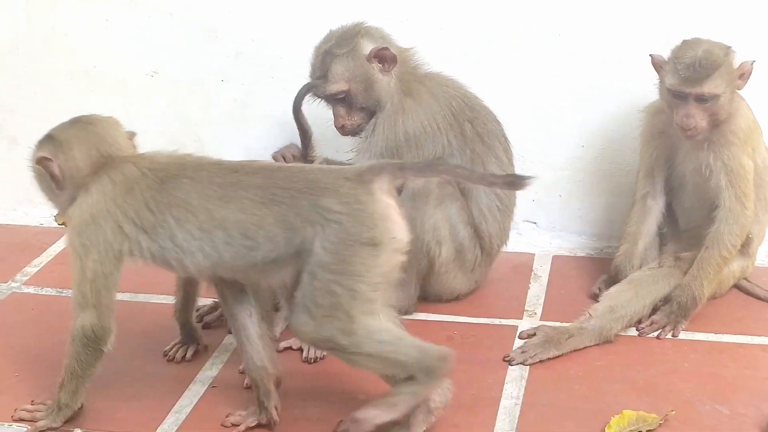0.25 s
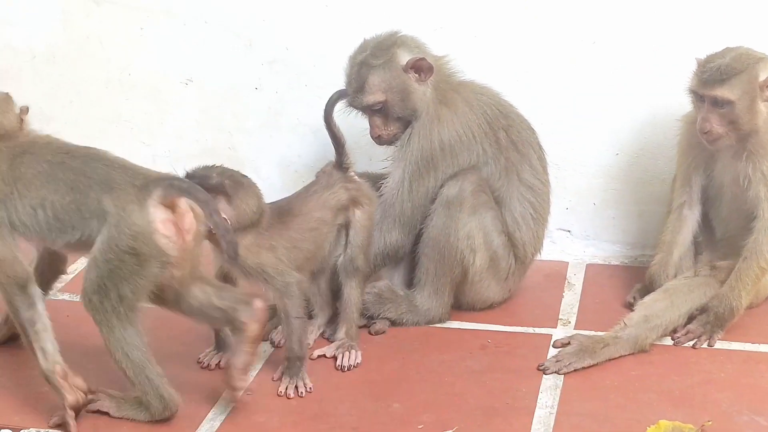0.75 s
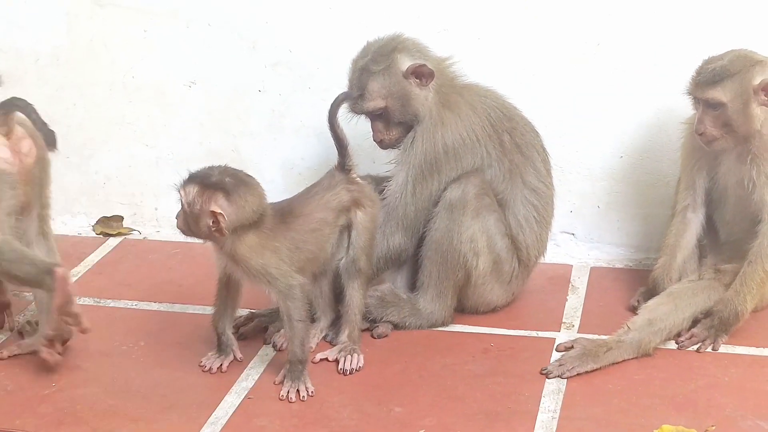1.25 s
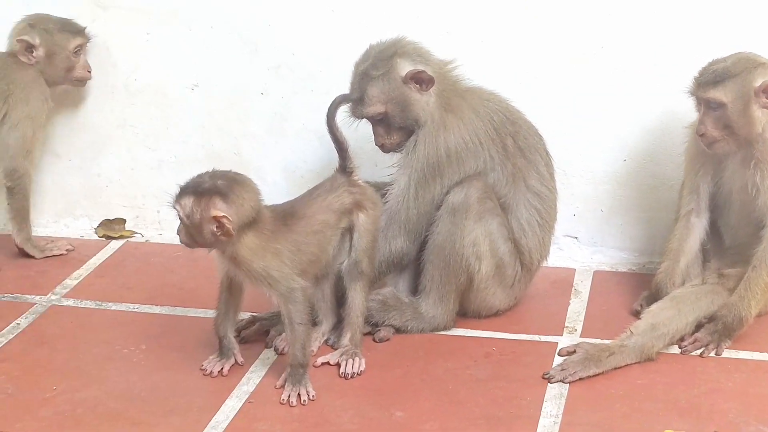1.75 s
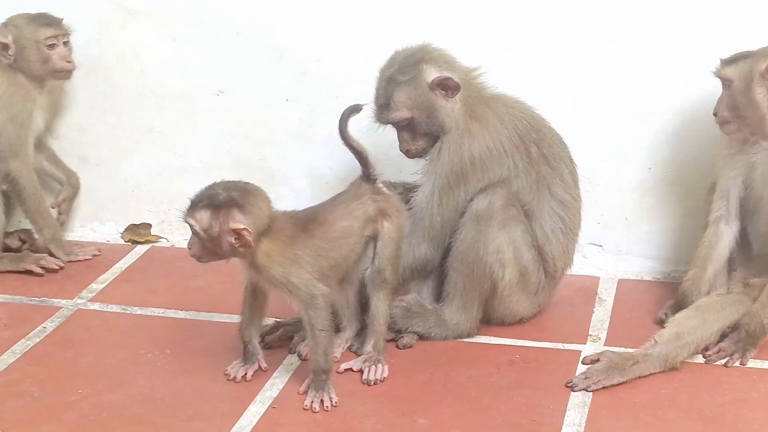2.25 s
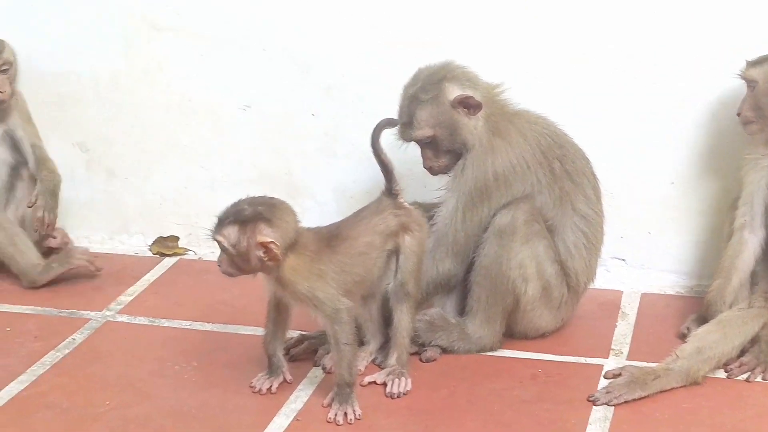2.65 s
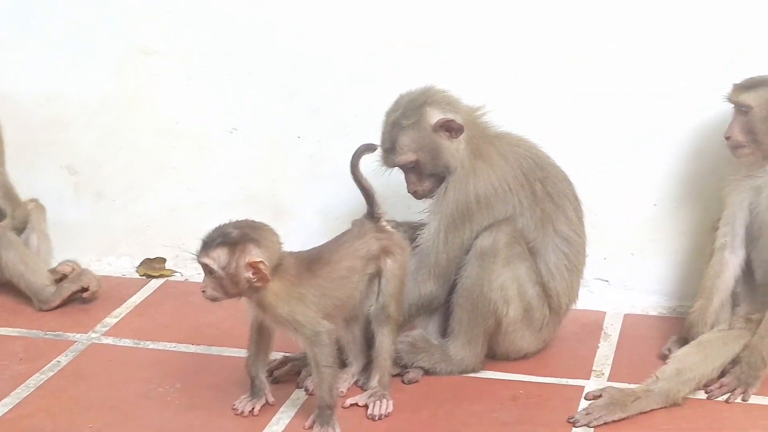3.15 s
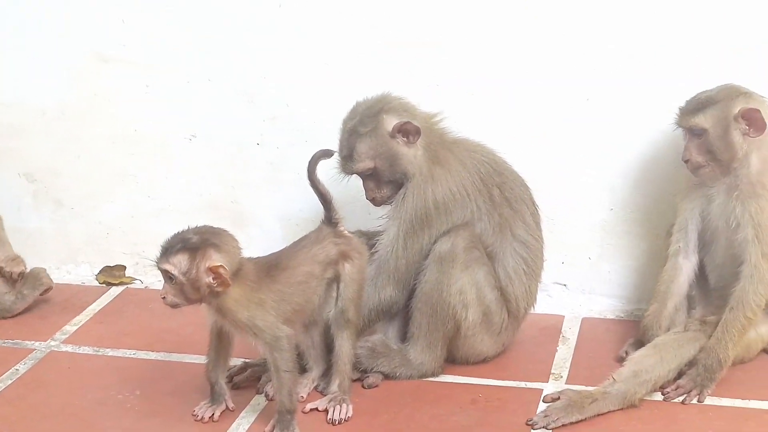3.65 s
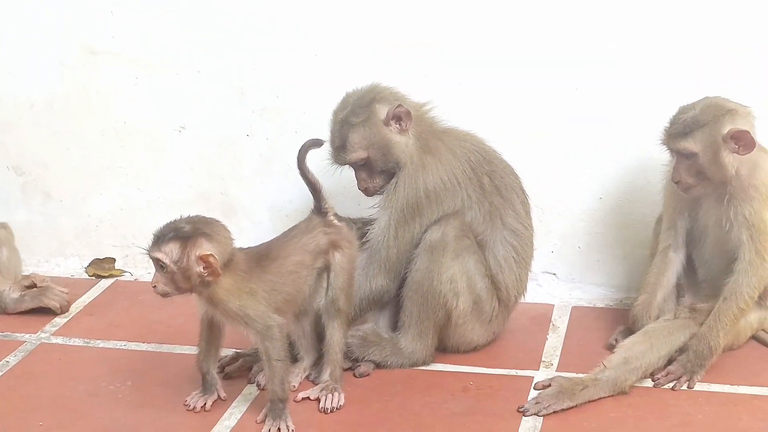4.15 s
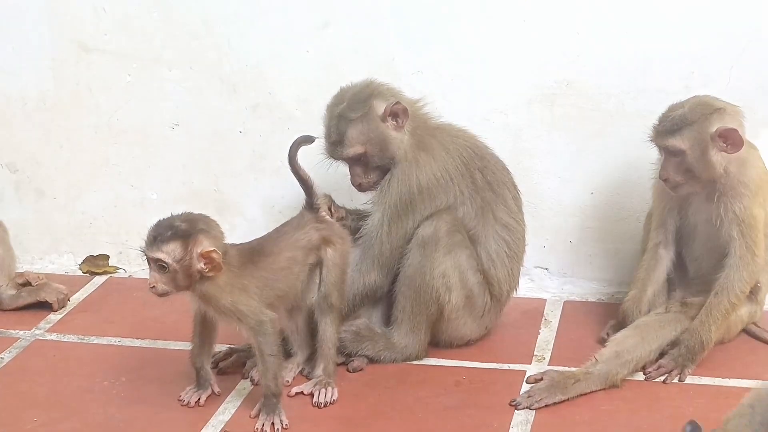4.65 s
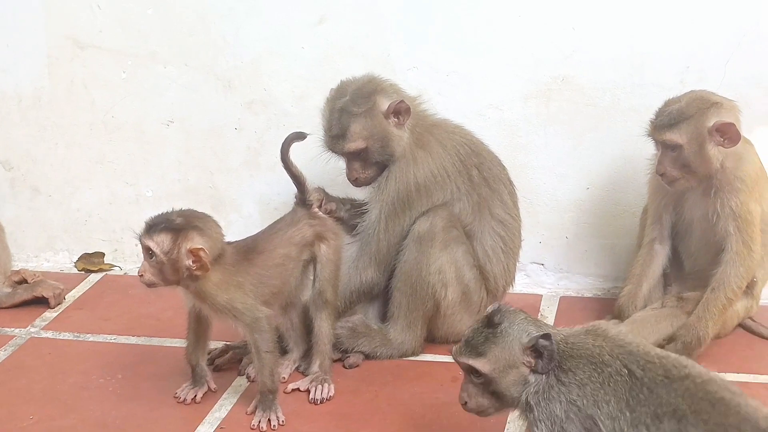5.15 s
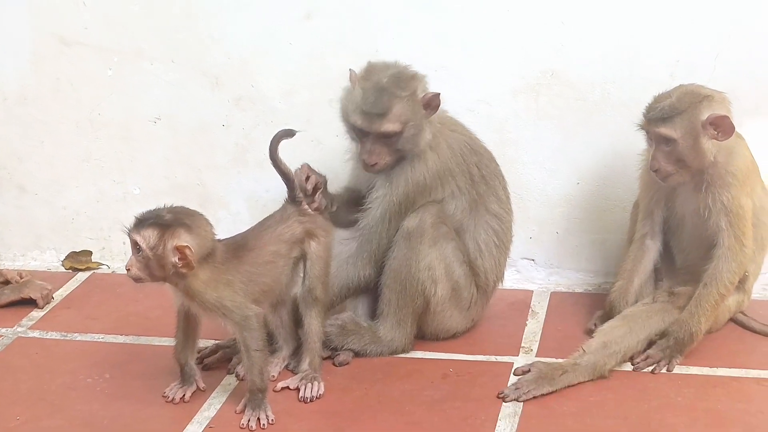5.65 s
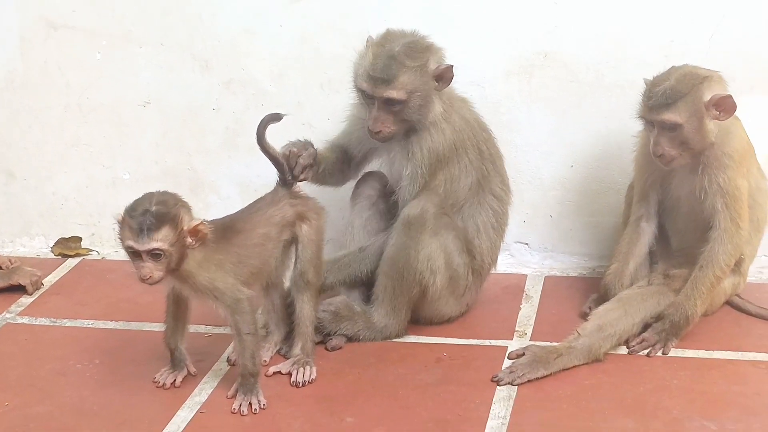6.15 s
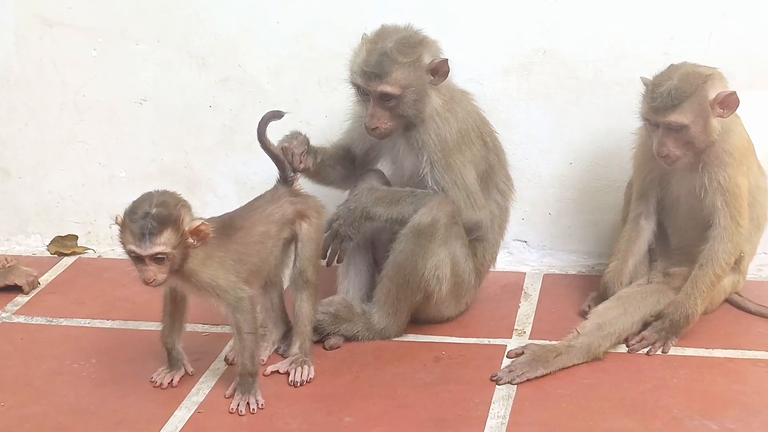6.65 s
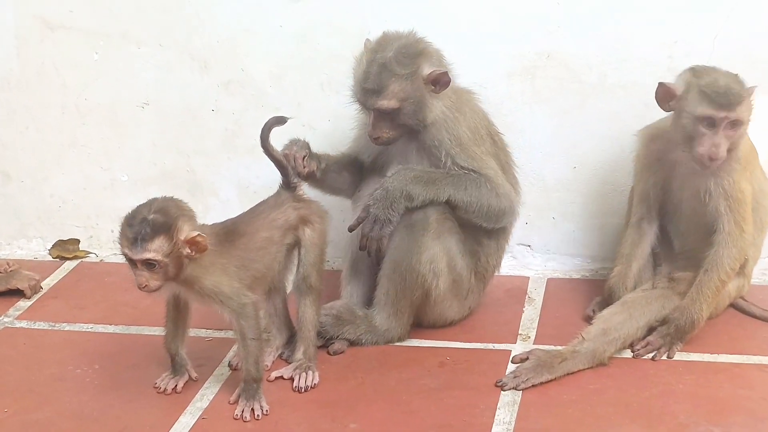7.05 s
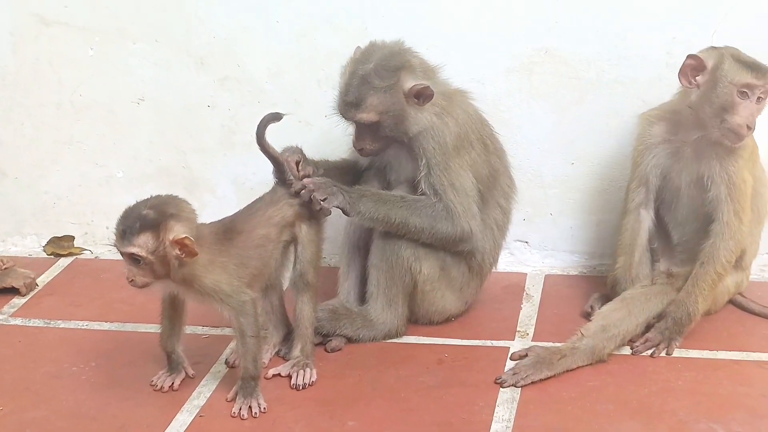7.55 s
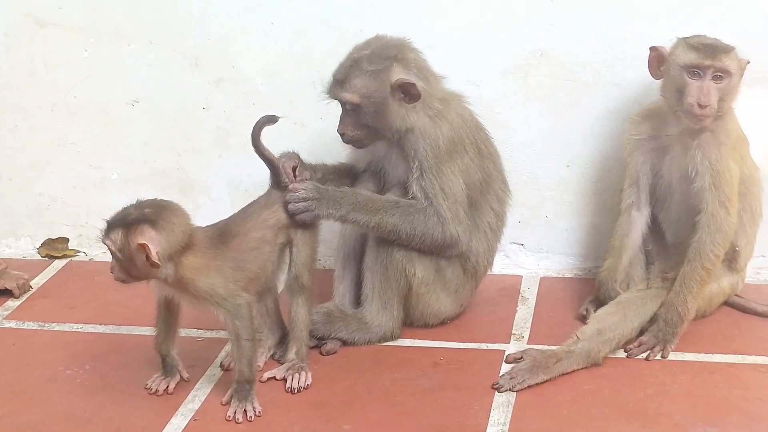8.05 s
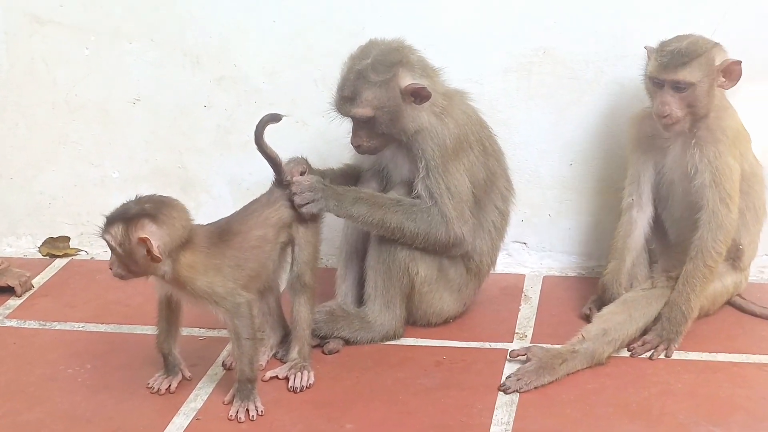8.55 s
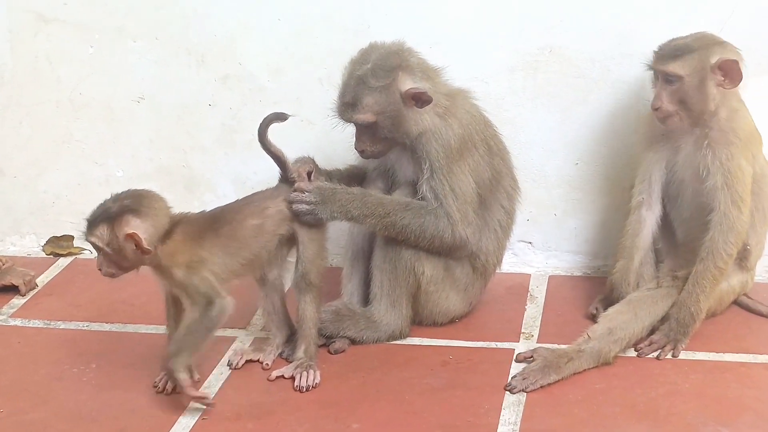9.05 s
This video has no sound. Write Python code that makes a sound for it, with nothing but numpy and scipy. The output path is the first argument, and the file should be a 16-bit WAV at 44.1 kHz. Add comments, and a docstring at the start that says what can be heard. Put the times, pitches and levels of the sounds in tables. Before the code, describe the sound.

Loud shrill insects buzz continuously outdoors while small monkeys coo, whoop and squeak now and then, with light rustles and one soft footfall thump.

```python
"""A cicada chorus drones around a tiled terrace: noise shaped like their song, with a slight buzz.
A high hiss around 14 kHz dips unevenly over it. Monkeys coo, whoop, trill, squeak and chirp with
gliding tones. Feet, fur and dry leaves scuff the tiles in short bursts of noise; two footfalls thump
and tick. Echoes, a yard hum and low wind lie behind. Two microphone ports hear the chorus from one side."""
import sys
import numpy as np
from scipy import signal
from scipy.fft import rfft, irfft, next_fast_len
from scipy.io import wavfile
from scipy.ndimage import uniform_filter1d

SR = 44100
rng = np.random.default_rng(int(sys.argv[2]) if len(sys.argv) > 2 else 0)


def to_wav(sig):
    """Store sig (one row per channel, or 1-D mono) as 16-bit WAV at the path in sys.argv[1].

    Samples outside -1..1 are clipped; the rate is SR.
    """
    pcm = np.clip(np.atleast_2d(sig), -1, 1) * 32767
    pcm = np.round(pcm).astype(np.int16)
    wavfile.write(sys.argv[1], SR, pcm.T)  # frames by channels


N = 410571  # length of the scene [samples]
FIELD_HZ = np.fft.rfftfreq(1024, 1 / SR)  # the pitches at which wide noise fields are shaped


def gain_of(db):
    """Turns decibels into a plain multiplier."""
    return 10 ** (np.asarray(db) / 20)


def evened(x):
    """Scales a signal to an average strength (rms) of 1."""
    return x / np.sqrt(np.mean(x ** 2) + 1e-20)


def read(points, hz):
    """Reads a table over frequency, with pitch spaced in octaves."""
    f, value = np.transpose(points)
    return np.interp(np.log(hz + 1), np.log(f + 1), value)


def wander(count, size):
    """Slow random drift of rms 1: noise averaged twice over `size` samples."""
    return evened(uniform_filter1d(uniform_filter1d(rng.standard_normal(count), size), size))


def band_noise(count, hz, octaves):
    """Noise in a bell-shaped band, rms 1."""
    size = next_fast_len(count, True)
    f = np.fft.rfftfreq(size, 1 / SR) + 1
    bell = np.exp(-2 * (np.log2(f / hz) / octaves) ** 2)
    spectrum = rfft(rng.standard_normal(size)) * bell
    return evened(irfft(spectrum, size)[:count])


def field(shape, patchy_db):
    """Stereo noise of a given spectrum, with drifting patches, as two ports hear it."""
    # How alike the two ports hear a pitch: (frequency [Hz], likeness [0-1])
    likeness = [(60, 1), (150, 1), (300, 0.92), (600, 0.78), (1000, 0.44), (1800, 0.39), (2300, 0.38),
                (3600, 0.1), (6000, 0.024), (15000, 0.066)]
    # How much louder the left port is: (frequency [Hz], left over right [dB])
    left_lean = [(100, 0.5), (600, -0.5), (950, 1), (1250, -2), (1700, 6), (2300, 3), (3800, 7),
                 (4600, 1.5), (7000, 2.5), (8500, -3), (10000, 13), (11500, 9.5), (14500, 8.5)]
    left_late_s = 0.00047
    frames = N // 256 + 6
    a, b, c, d, patches = rng.standard_normal((frames, 513, 5)).T
    patches = uniform_filter1d(patches, 9, axis=0)  # over neighbouring pitches
    patches = evened(uniform_filter1d(patches, 10, axis=1))  # over time
    same = np.clip(read(likeness, FIELD_HZ), 0, 1)[:, None]
    right, other = a + 1j * b, c + 1j * d
    # the bass reaches both ports alike
    late = np.exp(-2j * np.pi * np.maximum(FIELD_HZ - 570, 0) * left_late_s)[:, None]
    left = same * late * right + np.sqrt(1 - same ** 2) * other
    lean = gain_of(read(left_lean, FIELD_HZ) / 2)[:, None]  # half of it on each side
    spectrum = np.array([lean * left, right / lean])
    spectrum = spectrum * shape[:, None] * gain_of(np.reshape(patchy_db, (-1, 1)) * patches)
    x = signal.istft(spectrum, nperseg=1024, noverlap=768)[1][:, :N]
    return x / np.sqrt(np.mean(x.mean(0) ** 2))


def cicadas():
    """So many singers overlap that their clicks fuse into noise; a slight buzz is left."""
    # Loudness of the chorus: (time [s], level [dB])
    loudness = [(0.0, -46), (2.9, -46.5), (3.7, -46), (4.0, -46.5), (4.7, -44.5), (5.0, -45.5), (9.0, -46),
                (9.31, -45.5)]
    # Song spectrum, humped by two drum resonances: (frequency [Hz], relative strength [dB per Hz])
    song_shape = [(850, -69.5), (1450, -31), (1780, -11), (1870, -15.5), (2040, -25.5), (2300, -31.5),
                  (2660, -31), (3200, -4), (3530, 2), (3900, -2), (4190, -9), (5000, -22.5), (6500, -34.5),
                  (11000, -120)]
    # Fewer singers carry the low hump, so it wavers more: (frequency [Hz], wavering [dB])
    waver = [(1900, 2.5), (2800, 0.74)]
    s, db = np.transpose(loudness)
    level = gain_of(np.interp(np.arange(N) / SR, s, db))
    song = field(gain_of(read(song_shape, FIELD_HZ)), read(waver, FIELD_HZ))
    buzz = gain_of(0.66 * wander(N, size=70))
    return level * song * buzz


def high_hiss():
    """A high hiss around 14 kHz, dipping unevenly about seven to nine times a second."""
    # Loudness of the hiss: (time [s], level before the dips [dB], half the depth of a dip [dB])
    loudness = [(0.0, -68.5, 0), (1.1, -71, 0), (2.05, -72.5, -1), (2.2, -80, 0), (2.35, -71, 5),
                (3.3, -72.5, 0), (4.3, -71.5, 1), (5.4, -68, 1.5), (6.0, -65.5, 1.5), (7.3, -67, 3.5),
                (7.7, -65, 1), (8.0, -66, 1), (8.6, -62, 1), (8.7, -66, 2), (9.0, -63, 0.5), (9.31, -71, 2)]
    # The dips come slower, then quicker: (time [s], dips so far [count])
    dip_count = [(0.0, 0), (2.49, 22), (3.15, 28), (5.51, 45), (7.32, 57), (8.94, 69), (9.31, 71.7)]
    t = np.arange(N) / SR
    s, db, half_depth_db = np.transpose(loudness)
    count = np.interp(t, *np.transpose(dip_count))
    dip = ((1 + np.cos(2 * np.pi * count)) / 2) ** 1.2
    hiss = field(1 / (1 + ((FIELD_HZ - 13900) / 2200) ** 4), patchy_db=1.5)
    level_db = np.interp(t, s, db) - 2 * np.interp(t, s, half_depth_db) * dip
    return hiss * gain_of(level_db + 1.4 * wander(N, size=1300))


def call(db, hz, second_db, rough):
    """A near sine with an overtone an octave up; rough calls flutter in strength and pitch."""
    rough = np.clip(rough, 0, 1)
    shaky_hz = hz * (1 + 0.11 * rough * wander(len(hz), size=250))
    turn = 2 * np.pi * np.cumsum(shaky_hz) / SR
    flutter = (1 + rough * wander(len(hz), size=300)) / np.sqrt(1 + rough ** 2)
    tone = np.sin(turn) + gain_of(second_db) * np.sin(2 * turn)
    soft_ends = signal.windows.tukey(len(hz), .1)
    return np.sqrt(2) * gain_of(db) * flutter * tone * soft_ends


def whoop():
    """One long, clear call that steps up, wavers and drops."""
    # Course of the whoop: (time [s], level [dB], pitch [Hz], overtone over main tone [dB])
    course = [(2.056, -72, 950, -32), (2.068, -42.5, 942, -36), (2.106, -36, 938, -34),
              (2.114, -38, 992, -32), (2.124, -35.5, 1053, -34), (2.16, -35, 1094, -32),
              (2.175, -53, 1079, -21), (2.205, -42, 1130, -21), (2.23, -51, 1123, -13),
              (2.25, -36.5, 1109, -12), (2.272, -32.5, 1005, -20), (2.295, -57, 790, -28)]
    s, *columns = np.transpose(course)
    t = np.arange(s[0], s[-1], 1 / SR)
    db, hz, second_db = (np.interp(t, s, column) for column in columns)
    return s[0], call(db, hz, second_db, rough=0.042)


def coo(s, length, db, first_hz, last_hz, arch_hz, second_db, rough, pan_db, late_ms):
    """Rises, holds and falls; the pitch glides with an arch, the overtone is strongest early on."""
    rise, fall = 0.14, .3  # shares of the length
    edge_db, sag_db = -17.5, -3  # level at both ends, change over the hold
    u = np.linspace(0, 1, round(length * SR))
    arch = 4 * u * (1 - u)
    shape_db = np.interp(u, [0, rise, 1 - fall, 1], [edge_db, 0, sag_db, edge_db])
    hz = first_hz + (last_hz - first_hz) * u + arch_hz * arch
    overtone_db = second_db - 190.0 * (u - .36) ** 2
    return s, call(db + shape_db, hz, overtone_db, rough), pan_db, late_ms


def trill():
    """Two close tones beat, which breaks the note into soft beads; it drops to a faint tail."""
    start_s, bead_peak_s, beads_per_s = .192, 0.206, 32.6
    rise_s, hold_s, drop_s, tail_s = 0.012, 0.13, .02, .13
    note_db, tail_db, end_db = -47, -55, -76
    first_hz, sag_hz_per_s = 741, 117
    s = np.cumsum([0, rise_s, hold_s, drop_s, tail_s])
    t = np.arange(0, s[-1], 1 / SR)
    db = np.interp(t, s, [end_db, note_db, note_db, tail_db, end_db])
    beads = np.cos(np.pi * beads_per_s * (t + start_s - bead_peak_s))
    tone = np.sin(2 * np.pi * np.cumsum(first_hz - sag_hz_per_s * t) / SR)
    return start_s, gain_of(db) * evened(beads * tone)


def squeak():
    """A breathy whistle sweeps up and hangs; random changes of strength and pitch make the breath."""
    start_s, sweep_s, hang_s = 3.497, .048, 0.16
    low_hz, top_hz, end_hz, bend = 6840, 12500, 12100, 1.4
    sweep_db, hang_db = -59.5, -70
    t = np.arange(0, sweep_s + hang_s, 1 / SR)
    up, after = np.minimum(t / sweep_s, 1), np.maximum(t - sweep_s, 0)
    hz = low_hz + (top_hz - low_hz) * up ** bend + (end_hz - top_hz) * after / hang_s
    db = sweep_db + (hang_db - sweep_db) * np.minimum(after / .045, 1)
    turn = 2 * np.pi * np.cumsum(hz * (1 + 0.0063 * wander(len(t), size=100))) / SR
    return start_s, gain_of(db) * wander(len(t), size=60) * np.sin(turn)


def chirp(s, length, first_hz, last_hz, db, pan_db):
    """A gliding whistle whose strength flutters, partly differently at each port."""
    u = np.linspace(0, 1, round(length * 1.2 * SR))
    hz = first_hz + (last_hz - first_hz) * u
    size = round(SR / (120 + .02 * first_hz))  # higher chirps flutter faster
    turn = 2 * np.pi * np.cumsum(hz * (1 + .014 * wander(len(u), size=size))) / SR
    flutter = .5 + .9 * np.array([wander(len(u), size=size), wander(len(u), size=size)])
    soft_ends = signal.windows.tukey(len(u), .7)
    return s, gain_of(db) * flutter * np.sin(turn) * soft_ends, pan_db, .25


def scuff(s, length, hz, octaves, db, pan_db):
    """Grainy friction noise under one stroke, rising faster than it fades; the ports partly differ."""
    u = np.linspace(0, 1, round(length * 1.55 * SR))
    stroke = evened(np.minimum(u / .25, 1) * (1 - u))
    grain = gain_of(0.53 * wander(len(u), size=120))
    both, left, right = (band_noise(len(u), hz, octaves) for _ in range(3))
    friction = 0.56 * both + 0.64 * np.array([left, right])
    return s, gain_of(db) * stroke * grain * friction, pan_db, .25


def step(s, db, hz, tick_db, t60):
    """A compact thump of low noise with a short tick on top; the tick differs at each port."""
    t = np.arange(round(.25 * SR)) / SR
    thump_fade = gain_of(-20 * (t / (0.93 * t60)) ** 2)
    thump = band_noise(len(t), hz, 0.77) * np.minimum(t / 0.007, 1) * thump_fade
    tick = np.array([band_noise(len(t), 1010, 0.67) for _ in range(2)])
    tick = tick * gain_of(tick_db - 60 * t / t60) * np.minimum(t / 0.0022, 1)
    return s, gain_of(db) * (thump + tick)


def wall(x):
    """Sparse echoes of random sign, dying away: the terrace wall and the yard."""
    taps = np.zeros((2, SR // 2))
    # one echo at a random place in every 20 samples
    at = np.arange(400, SR // 2 - 20, 20) + rng.integers(0, 20, (2, (SR // 2 - 401) // 20))
    np.put_along_axis(taps, at, rng.choice([-1., 1.], at.shape), 1)
    taps *= gain_of(-60 * np.arange(SR // 2) / SR / 0.16)  # 60 dB down every 0.16 s
    return signal.oaconvolve(x, taps / np.linalg.norm(taps[0]), axes=1)[:, :N]


def air():
    """Yard hum and far insects fuse into a steady, patchy noise of fixed colour."""
    # Colour of the background: (frequency [Hz], relative strength [dB per Hz])
    colour = [(40, -29.5), (140, -11.5), (400, -19.5), (1200, -23.5), (2400, -15.5), (4800, 1.5),
              (6800, -0.5), (8200, -1), (9200, -12.5), (10200, -8), (11400, -16), (12500, -19.5),
              (15600, -23)]
    return gain_of(-59.5) * field(gain_of(read(colour, FIELD_HZ)), patchy_db=1.58)


def wind():
    """Lumpy low rumble on the ports, nearly alike at both, with a few stronger puffs."""
    # Puffs of wind on the ports: (time of the peak [s], level before the lumps [dB])
    puff_peaks = [(1.06, -77), (1.4, -83), (1.85, -73.5), (2.6, -86), (3.6, -87), (5.08, -93), (6.14, -83),
                  (6.69, -85), (6.86, -92), (7.13, -68), (7.77, -79), (8.22, -76), (8.99, -79), (9.14, -77)]
    rise_db_per_s, fall_db_per_s = 250, 153
    t = np.arange(N) / SR
    both, left, right = (band_noise(N, 81, 1.44) for _ in range(3))
    puffs = np.zeros(N)
    for s, db in puff_peaks:
        drop_db = np.maximum(rise_db_per_s * (s - t), fall_db_per_s * (t - s))
        puffs += gain_of(db - drop_db)
    calm = gain_of(-92.5 + 3.5 * wander(N, size=4000))
    lumps = gain_of(1.2 * wander(N, size=1500))
    return (calm + puffs) * lumps * (both + 0.26 * np.array([left, right]))


def add(mix, s, sound, pan_db=0, late_ms=0):
    """Places a sound, mono or stereo, at the two ports; level and delay are set on the left."""
    left, right = np.broadcast_to(sound, (2, sound.shape[-1]))
    for side, one, shift, db in ((0, left, late_ms / 1000, pan_db), (1, right, 0, 0)):
        part = mix[side, round((s + shift) * SR):][:len(one)]
        part += gain_of(db) * one[:len(part)]


def scene():
    """Adds the near sounds and their echoes to the cicadas, the hiss, the air and the wind."""
    # Short coos and grunts: (time [s], length [s], level [dB], first pitch [Hz], last pitch [Hz],
    # pitch arch [Hz], strongest overtone over main tone [dB], roughness [0-1],
    # left over right [dB], left delay [ms])
    coo_rows = [ (0.0, 0.19, -55.5, 591, 539, -3, -15, .55, -5.5, 0.27),
                (.125, 0.083, -51.5, 598, 570, 11, -12, 0.84, -2, .31),
                (0.088, 0.11, -58, 422, 397, 0, -13, 0.65, -3, .36),
                (0.178, 0.12, -56, 340.5, 352, 18, 10, 0.67, -5, .36),
                (0.326, 0.066, -57.5, 593, 580, 0, -20, 0.28, -3, .36),
                (0.306, .05, -60, 345, 337, -1, 15, 0.54, -6, 0.27),
                (.385, 0.11, -60.5, 379, 405, -4, -1, 0.63, 0, .36),
                (1.567, 0.28, -49, 465, 382, 57, -14.5, 0.11, -1.5, .3),
                (2.21, .175, -60.5, 617, 574, 2, -30, 0.3, -5.5, .16),
                (2.283, 0.16, -65.5, 1102, 1115, 11, -30, 0.1, 4, -0.14),
                (2.439, .11, -77, 1144, 1054, 2, -30, .2, 8, -0.21),
                (3.075, 0.097, -59, 360, 366, 13, -25, 0.66, -3.5, 0.36),
                (3.82, 0.16, -62, 336, 337, 51, -17, .5, -7.5, .38),
                (4.033, 0.12, -65, 415, 392, 1, -25, .3, 2, .36),
                (4.075, 0.089, -66.5, 202, 188, -2, -25, .3, 3, .1),
                (7.994, 0.099, -67.5, 436, 408, 0.5, -18, 0.25, 3, 0.28),
                (8.083, 0.058, -67, 428, 416, 0, -25, 0.35, 0, .25),
                (8.178, .2, -64, 880, 880, 41, -25, .45, -2, 0.14), ]
    # Thin breathy chirps: (time [s], length before a 1.2 times stretch [s], first pitch [Hz],
    # last pitch [Hz], level before the flutter [dB], left over right [dB])
    chirp_rows = [ (0.08, 0.061, 932, 926, -61.5, 8), (0.07, 0.095, 2290, 2280, -65, 10),
                  (.1, .09, 1300, 1350, -65, 5), (.32, 0.09, 1250, 1240, -67, 4),
                  (0.114, 0.06, 684, 664, -55, -4), (.42, 0.069, 1070, 1285, -64, 4),
                  (3.59, 0.075, 11100, 10400, -65, 9), (3.698, 0.038, 3270, 3355, -43, 7),
                  (3.746, 0.026, 2790, 2650, -48.5, 4), (3.845, 0.12, 1066, 1110, -73, 6),
                  (3.925, 0.055, 13600, 13800, -63, 5), (3.919, 0.068, 6850, 6900, -54, 1),
                  (4.005, .04, 13900, 13100, -65, 5), (4.451, 0.052, 2500, 2460, -50, 5),
                  (4.474, 0.12, 2180, 2070, -50.5, 7), (4.537, 0.049, 2420, 2550, -46, 5.5),
                  (4.587, 0.035, 2520, 3180, -53, 7), (4.637, 0.036, 13500, 12400, -59, 7),
                  (4.641, 0.098, 917, 837, -70, 4.5), (4.718, .03, 12700, 12900, -59, 5),
                  (4.897, 0.077, 1254, 1240, -67.5, 5.5), (4.967, 0.049, 11600, 11600, -66, 6),
                  (5.033, .045, 13300, 12700, -60, -5), (5.165, .04, 13100, 12300, -59, 7),
                  (5.313, 0.044, 2410, 2440, -56.5, 4), (5.555, 0.063, 7700, 8700, -58.5, -1),
                  (5.904, 0.14, 8060, 8300, -60, 0), (6.025, 0.073, 8030, 6700, -57, 2),
                  (6.359, 0.21, 1380, 1460, -61.5, 2), (7.592, 0.11, 6660, 8340, -57, 2.5),
                  (8.0, 0.072, 10100, 9800, -64, 9.5), (8.27, .05, 2550, 2460, -65, 3),
                  (8.99, 0.14, 1300, 1290, -67, 0), (9.01, .075, 13700, 12200, -62, 8),
                  (9.19, .04, 12600, 12000, -63, 4), ]
    # Scuffs of feet, fur and leaves: (time [s], length before a 1.55 times stretch [s],
    # centre [Hz], width [octaves], level before the grain [dB], left over right [dB])
    scuff_rows = [ (0.094, 0.24, 1480, 0.94, -62.5, 3.5), (0.398, 0.09, 1280, 0.35, -58, 0),
                  (1.077, 0.056, 322, 0.16, -65.5, -10), (1.1, 0.049, 1280, 0.22, -69, -4),
                  (3.07, 0.13, 1300, .3, -72.5, 2), (3.411, 0.055, 1200, 0.65, -64.5, 1.5),
                  (3.527, .05, 12100, 0.4, -60, 5), (3.668, 0.095, 6950, 0.86, -59, 3),
                  (3.802, 0.12, 1246, 0.18, -69, 3.5), (3.95, .07, 13200, .25, -69, 5),
                  (4.054, 0.038, 1256, 0.08, -70, 1), (4.373, .14, 13300, .3, -67.5, 6),
                  (4.416, 0.092, 6900, 0.5, -54, 1.5), (4.454, 0.18, 2560, 0.64, -57.5, 5.5),
                  (4.607, 0.061, 8900, .8, -67, 5), (4.63, 0.15, 13200, .3, -65, 4.5),
                  (4.59, .05, 7200, .3, -60, 2), (4.933, .04, 7000, 0.44, -62, 1),
                  (4.737, .08, 6900, 0.81, -59.5, 2.5), (4.801, 0.017, 3600, 0.17, -47, 13),
                  (5.005, .3, 12900, .1, -70, 6), (5.02, .08, 13400, .3, -65, 6),
                  (5.14, 0.073, 13100, 0.33, -63, 5), (5.192, 0.13, 4080, 1.33, -55.5, 3.5),
                  (5.545, .12, 13400, .3, -67, 5), (5.55, 0.15, 8450, 0.44, -62.5, 3),
                  (6.187, 0.048, 234, 0.65, -65, -1), (6.818, 0.11, 980, 0.44, -73.5, -3),
                  (6.895, 0.053, 3220, 1.97, -50, -3), (7.6, 0.12, 7500, .25, -61, -1),
                  (7.714, .12, 7700, 0.34, -60.5, 0), (8.071, .06, 230, 0.46, -78, 3),
                  (8.222, 0.12, 1090, 0.55, -65.5, 2), (8.237, 0.095, 2780, 0.6, -58.5, 4),
                  (8.5, .12, 14700, .2, -68, -4), (8.801, 0.03, 1110, 0.54, -62.5, 1),
                  (9.0, 0.09, 13400, 0.27, -67, 4), (9.01, 0.075, 406, 0.4, -76.5, -6),
                  (9.094, 0.13, 6600, 1.8, -60.5, 5.5), ]
    # Footfalls on tile: (time [s], level [dB], thump centre [Hz], tick over thump at the start [dB],
    # time for the tick to fade by 60 dB [s])
    step_rows = [(7.111, -50.5, 197, -1, 0.065), (8.003, -61.5, 730, 5, 0.034)]
    near = np.zeros((2, N))
    add(near, *whoop(), pan_db=-0.8, late_ms=-0.29)
    for row in coo_rows:
        add(near, *coo(*row))
    add(near, *trill(), pan_db=1.0, late_ms=.12)
    add(near, *squeak(), pan_db=8.5, late_ms=.25)
    for row in chirp_rows:
        add(near, *chirp(*row))
    for row in scuff_rows:
        add(near, *scuff(*row))
    for row in step_rows:
        add(near, *step(*row))
    echoes = gain_of(-13.0) * wall(near)
    return cicadas() + high_hiss() + near + echoes + air() + wind()


def record(dry):
    """The band limit: a steep filter takes away the treble above its edge."""
    edge_hz = 15690
    low_pass = signal.firwin(1023, edge_hz, window=("kaiser", 9), fs=SR)
    return signal.oaconvolve(dry, low_pass[None], "same")


dry = scene()
out = record(dry)
to_wav(out)
```